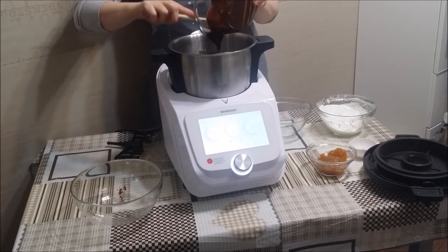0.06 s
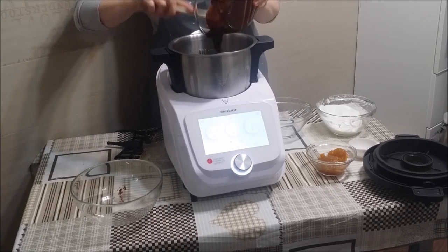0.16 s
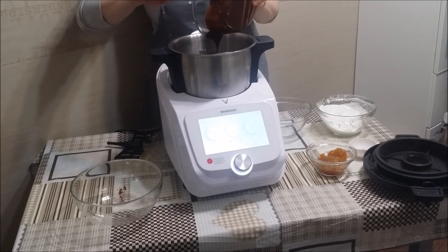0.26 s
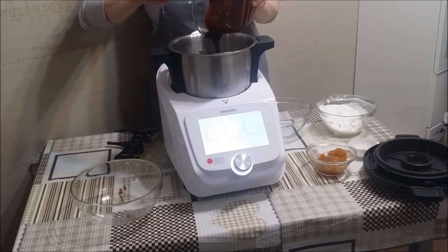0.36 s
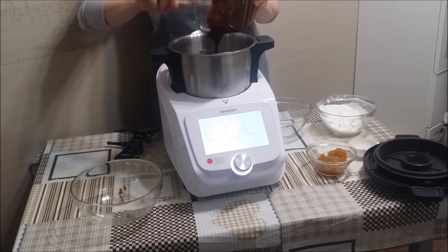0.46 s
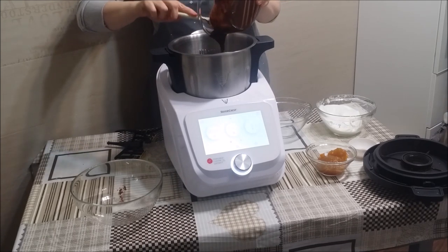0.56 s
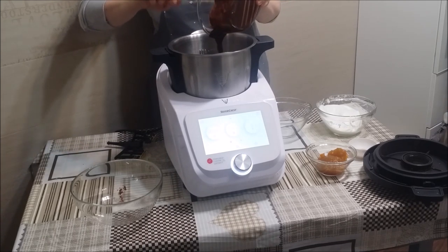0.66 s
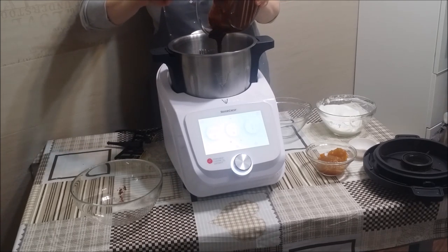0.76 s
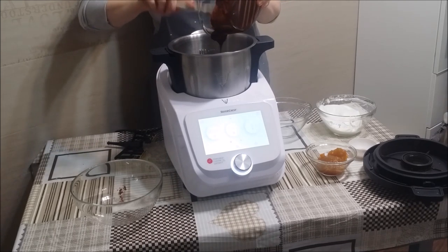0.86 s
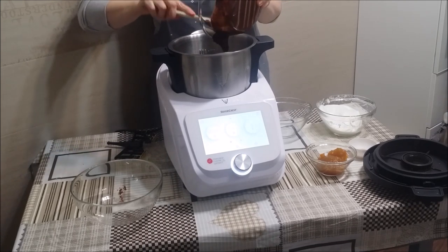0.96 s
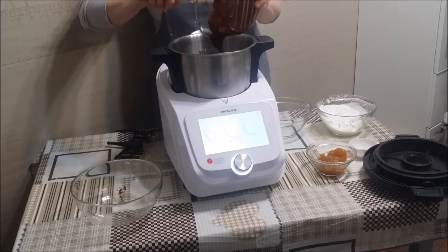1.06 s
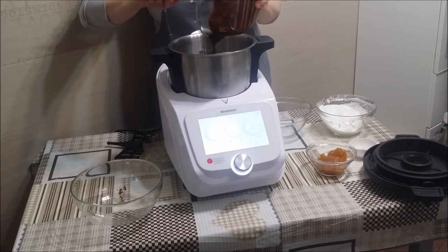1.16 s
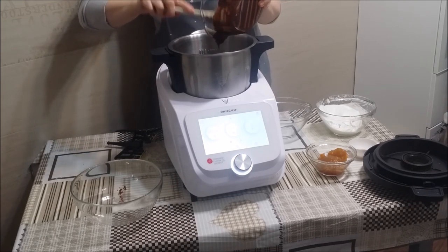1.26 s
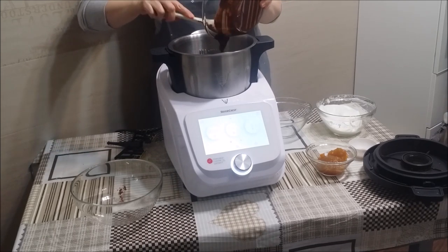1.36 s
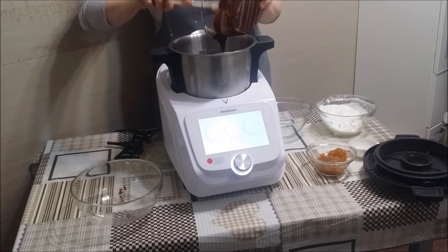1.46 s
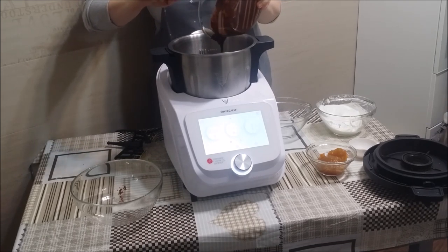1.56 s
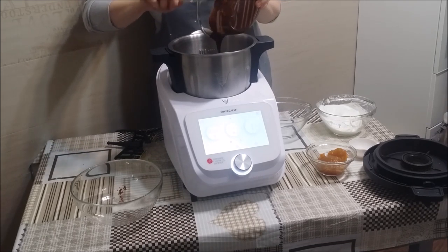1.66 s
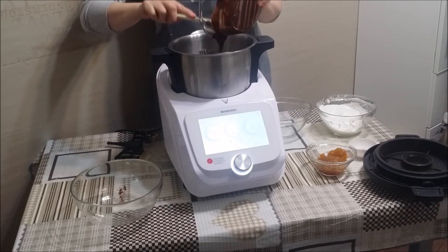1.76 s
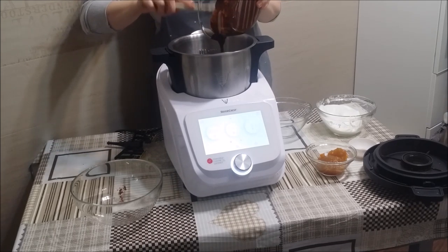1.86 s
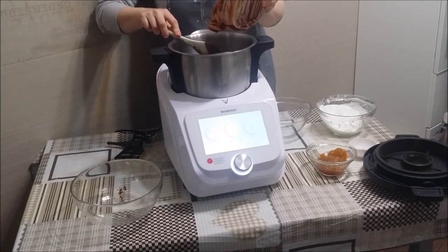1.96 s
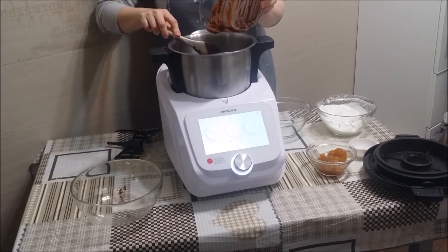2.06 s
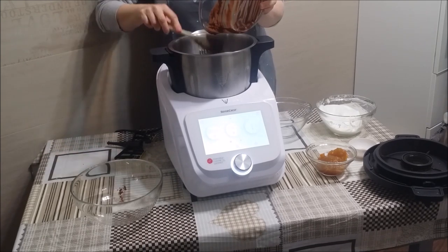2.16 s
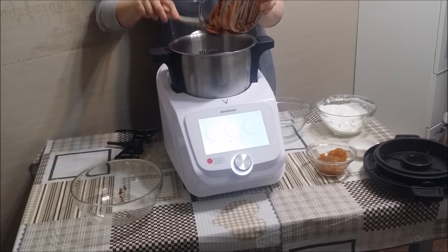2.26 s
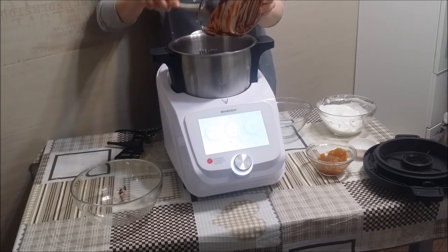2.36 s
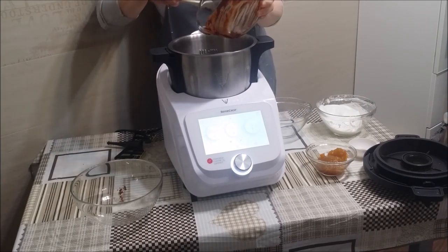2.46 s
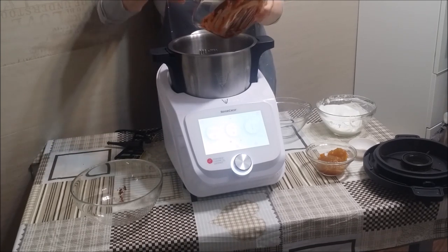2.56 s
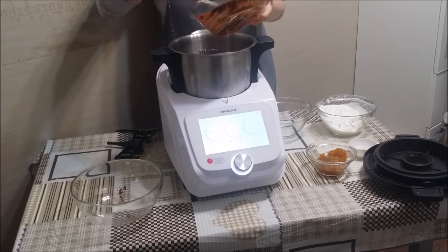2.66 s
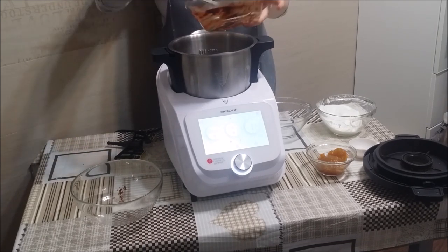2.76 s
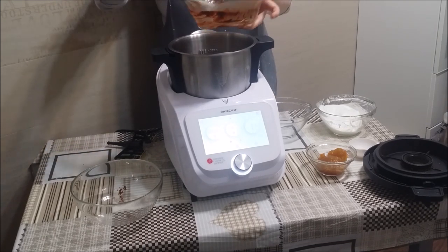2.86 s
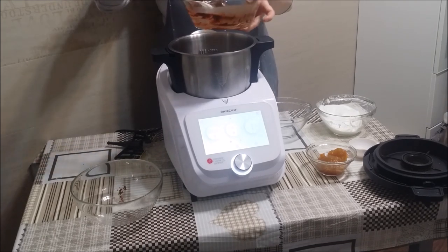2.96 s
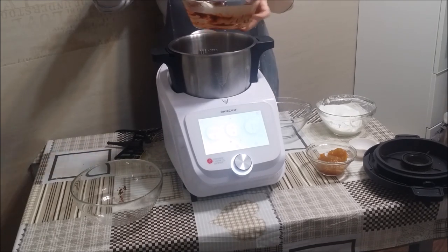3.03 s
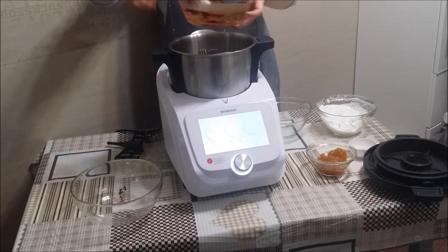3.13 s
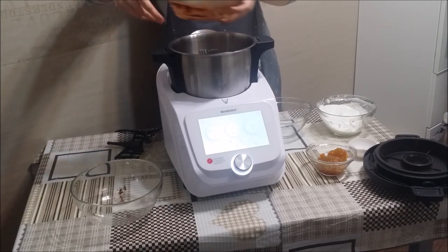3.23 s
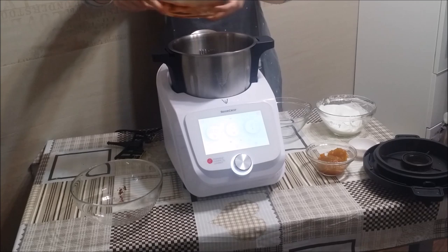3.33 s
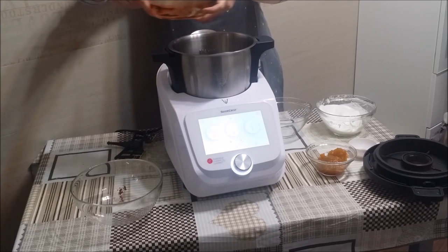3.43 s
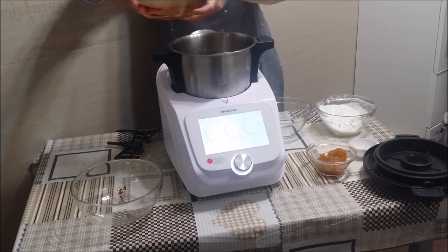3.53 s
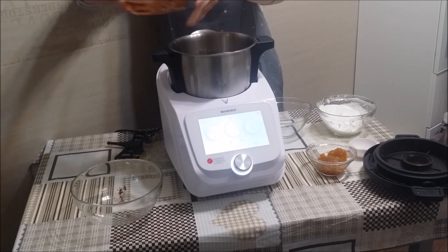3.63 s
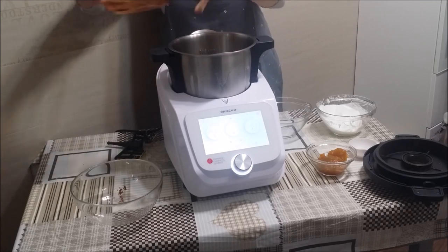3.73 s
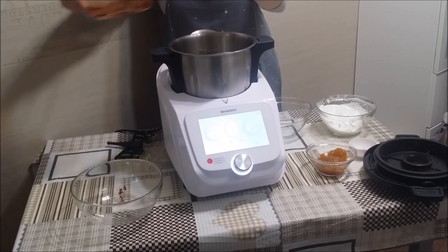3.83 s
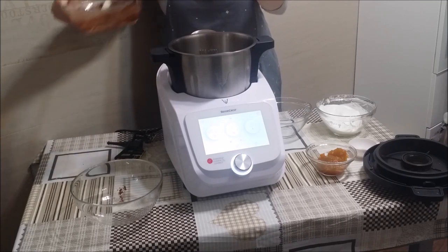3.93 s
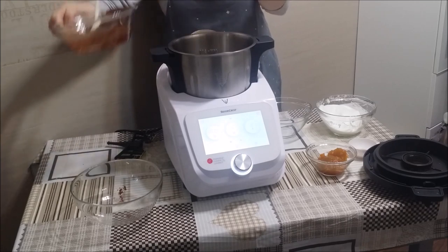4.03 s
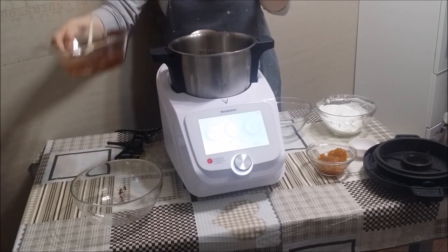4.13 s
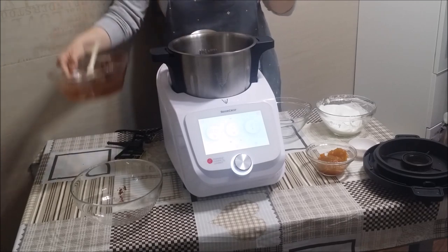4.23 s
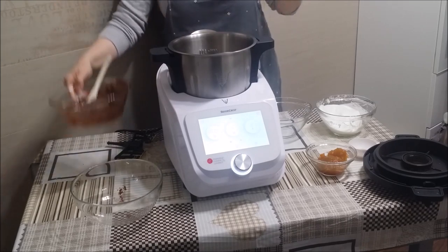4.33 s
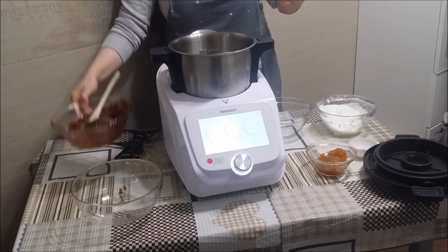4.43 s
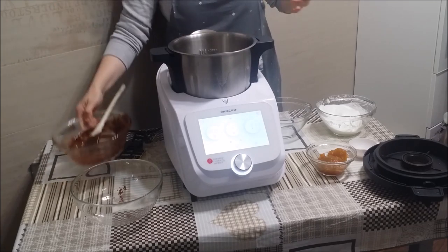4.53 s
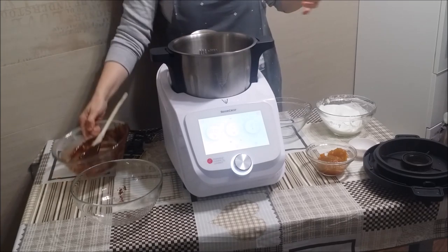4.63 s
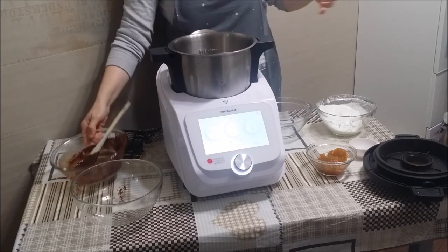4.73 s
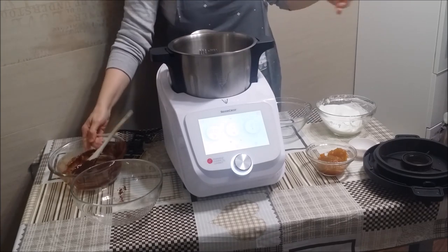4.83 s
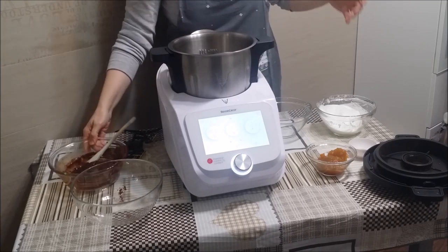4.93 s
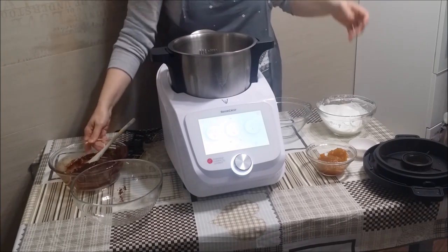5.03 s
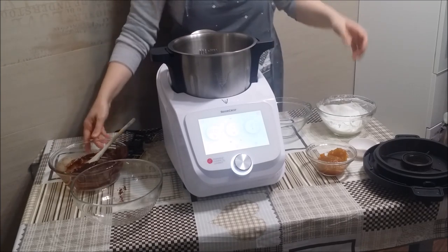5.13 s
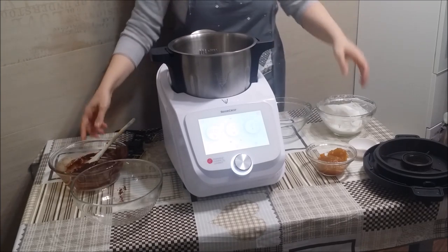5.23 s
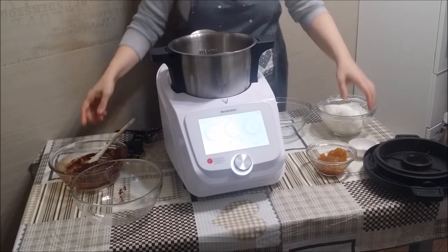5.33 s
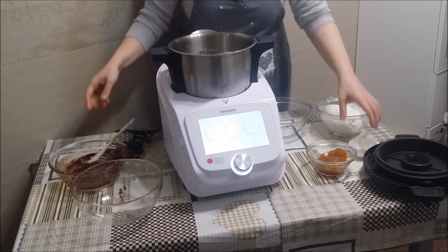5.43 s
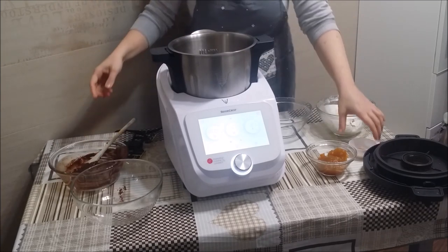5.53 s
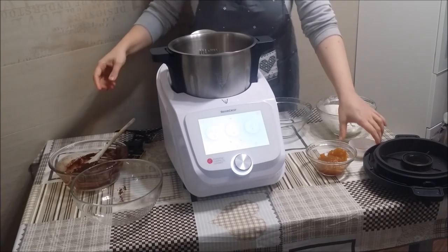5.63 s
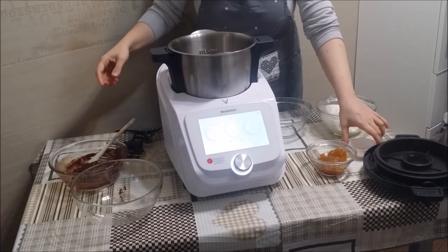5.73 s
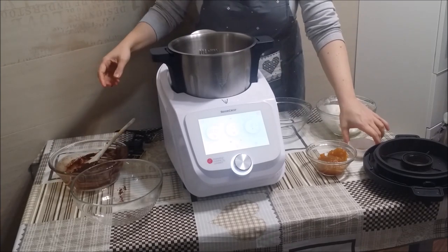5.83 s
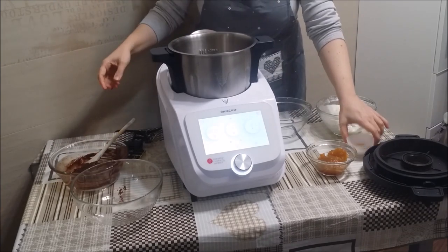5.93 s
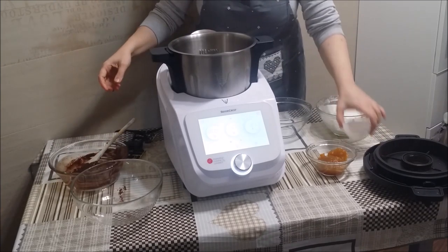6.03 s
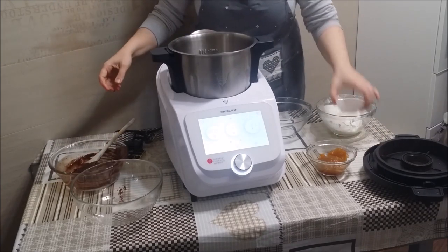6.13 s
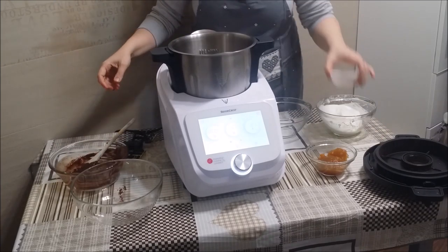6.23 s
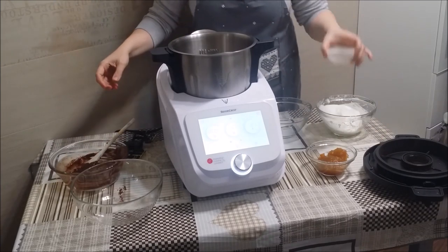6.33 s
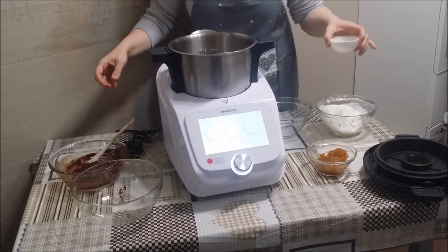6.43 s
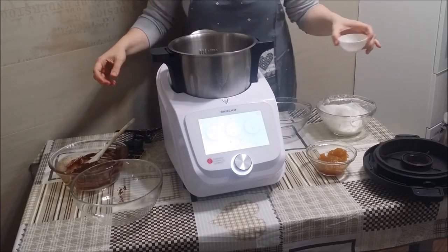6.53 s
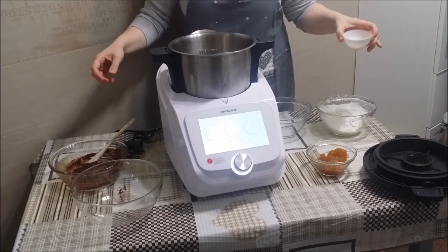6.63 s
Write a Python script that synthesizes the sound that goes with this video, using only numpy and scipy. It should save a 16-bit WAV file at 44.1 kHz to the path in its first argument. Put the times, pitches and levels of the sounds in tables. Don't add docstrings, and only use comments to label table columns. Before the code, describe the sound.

Quiet kitchen with fridge hum, low house rumble, slight hiss and a thin electric whine towards the left. Several muffled spoon pats on a loaded glass dish come first, then a wet smack and sharp double knock on a steel pot with a hollow boom. A small rim tink leads to a clear glass clink with rattling bounces. Later the dish thumps down and rocks; finally a cup grazes barely audibly. Stereo camera microphone, short live echo.

```python
import sys
import numpy as np
from scipy import signal
from scipy.fft import rfft, irfft, next_fast_len
from scipy.io import wavfile
from scipy.ndimage import uniform_filter1d

SR = 44100
rng = np.random.default_rng(int(sys.argv[2]) if len(sys.argv) > 2 else 0)


def volts_from_decibels(level):
    exponent = np.asarray(level, float) / 20
    return 10 ** exponent


def wrap_up_sound(samples):
    columns = np.atleast_2d(samples).T
    tamed = np.clip(columns, -1, 1)
    steps = np.round(tamed * 32767).astype(np.int16)
    wavfile.write(sys.argv[1], SR, steps)


N = 294984
T = np.arange(N) / SR

SHAFT_ORDERS = (2, 4, 6, 13, 17, 18, 19, 20)
SHAFT_ORDER_DB = (-48.5, -84.5, -71.5, -80.5, -89.5, -76, -83, -82.5)
CYCLE_STARTS_S = (.250, 2.473)
CYCLE_COUNTS = (3, 7)
# freq_hz, density_db_per_hz
AIR_COLOUR = [(20, -12.5), (34, 1), (50, -13), (80, -1), (150, -3), (300, -4), (520, -11), (900, -14),
              (1500, -22), (6500, -29), (7700, -23), (8600, -21), (9800, -28), (15500, -29)]
# start_s, length_s, level_db
SWELLS = [
    (0, .56, -59.5),
    (.6, .85, -63),
    (1.55, 0.88, -65),
    (2.47, .68, -64),
    (3.3, 0.48, -62),
    (5.35, 0.85, -65),
]
# start_s, peak_db, treble_db
PATS = [
    (.014, -37.5, 0.5),
    (.480, -36, 2),
    (.904, -45, -4),
    (1.265, -43.5, -10),
    (1.767, -37, -9),
    (2.795, -56, -10),
]
# freq_hz, level_db, t60_s
FULL_DISH_MODES = [(700, -5, .06), (739, 0, .13), (832, -4, .09), (964, -8, .11), (1100, -20, .07),
                   (408, -15, .07)]
# freq_hz, density_db_per_hz
PAT_COLOUR = [(200, -30), (350, -12), (600, -8), (780, 0), (1100, -13), (1500, -20), (2500, -27),
              (4000, -35), (9000, -54)]
# start_s, peak_db, centre_hz,
# width_hz
SMACKS = [(0.016, -73.5, 4164, 40), (.682, -56.5, 3720, 5700), (1.209, -69, 1110, 150),
          (1.908, -60.5, 5750, 6000), (2.004, -43, 2660, 1400), (2.369, -67, 10500, 5000),
          (2.797, -59, 3650, 2450), (4.309, -67.5, 1100, 150), (5.305, -67.5, 1120, 60.2),
          (5.39, -63, 660, 40.3), (5.746, -80, 8300, 200), (3.027, -60, 13040, 4030),
          (6.312, -69, 1070, 150)]
# start_s, length_s, sleeve_db, glass_db
STROKES = [
    (1.007, .1, -69, -99),
    (1.109, 0.24, -65, -99),
    (1.386, 0.13, -65.5, -99),
    (3.621, 0.15, -65, -70.5),
    (4.08, 0.3, -77, -71.5),
    (4.28, 0.11, -71.5, -107),
    (6.267, 0.112, -70.5, -99),
]
# freq_hz, density_db_per_hz
SLEEVE_COLOUR = [(300, 3.5), (900, 4), (2500, -3.5), (5000, -5), (9000, -6.5), (14000, -20)]
# freq_hz, level_db, t60_s
STROKED_DISH_MODES = [(945, -6, .12), (2064, 0, .12), (3478, -4, .12), (5240, 1, .12), (7300, -5, .05),
                      (8540, -4, .05), (9680, -10, .08)]
# start_s, peak_db, treble_db
KNOCKS = [
    (2.002, -35, 1),
    (2.077, -20, 10),
    (2.084, -25, 0.5),
    (2.196, -26, -2.5),
    (2.207, -39, 1),
]
# freq_hz, level_db, t60_s
POT_MODES = [(1066, -9, 0.26), (1398, -14, .15), (1886, -23, 0.52), (1995, -3, 0.28), (1950, -14, .1),
             (2320, 4.5, 0.11), (2935, -11, .3), (2950, -5, 0.26), (3230, 7.5, 0.12), (3500, -2, 0.24),
             (3865, -2.5, .15), (4400, 5, 0.05), (5420, 4, 0.083), (5720, -25, 0.19), (6470, -18.5, 0.18),
             (6650, -24, .2)]
# freq_hz, density_db_per_hz
KNOCK_COLOUR = [(150, -17), (400, -3.5), (560, -9.5), (1100, -7.5), (1650, -8), (1950, 3.5), (2600, -12.5),
                (3400, -5.5), (4500, -13.5), (6500, -10.5), (8500, -18.5), (11000, -32), (15000, -39.5)]
# start_s, peak_db, treble_db
BOOMS = [
    (2.003, -33.5, -5.5),
    (2.079, -27.5, -5.5),
    (2.092, -24.5, 7),
    (2.198, -24, -12.5),
    (2.215, -29, -2),
]
# freq_hz, level_db, t60_s
CASE_MODES = [(146, -3.5, 0.36), (182, 1.5, 0.1), (238.3, -8, 0.14), (293, -2.5, 0.12), (369, 0, 0.073),
              (419, -8, 0.18), (590, -6, 0.045)]
# start_s, peak_db, treble_db
TINKS = [
    (2.795, -39, -12.5),
    (2.866, -64, -2),
]
# freq_hz, level_db, t60_s
RIM_MODES = [(4380, -4, .3), (4420, 0, .25), (4480, -6, .1), (1530, -3, .06), (1700, -4, .06),
             (1400, -7, .05), (640, -8, .06), (6820, -20, .1)]
# start_s, peak_db, treble_db
CLINKS = [
    (3.026, -19, -3.5),
    (3.033, -22, 3),
    (3.043, -36.5, 10.5),
    (3.128, -33, -5),
    (3.171, -36.5, -2),
]
# freq_hz, level_db, t60_s
EMPTY_DISH_MODES = [(393, -24, 0.19), (935.8, -9, 0.34), (2060, 3.5, 0.12), (2052, 4, 0.32),
                    (2116, -7.5, 0.12), (3462, -4.5, 0.19), (4500, -12, 0.072), (5260, -18, 0.36),
                    (7300, -21.5, 0.28), (8560, -15.5, 0.23), (8700, -17.5, 0.141), (9100, -21, 0.22),
                    (9600, -26, 0.22), (10150, -28.5, .15), (11640, -29, 0.069)]
# freq_hz, density_db_per_hz
CLINK_COLOUR = [(250, -37.5), (420, 3.5), (900, -9), (1200, -16), (1800, 9), (2600, -4.5), (5000, 0),
                (9000, -12.5), (12000, -25.5), (15000, -37.5)]
# start_s, peak_db, treble_db
LANDINGS = [
    (4.984, -27.5, 11),
    (4.991, -16, 4),
    (4.999, -21, 5),
    (5.021, -36, 7.5),
    (5.068, -28, 6),
    (5.129, -34, 11.5),
    (5.144, -22.5, -18.5),
    (5.205, -37.5, -10),
    (5.275, -58, -16),
]
# freq_hz, level_db, t60_s
TABLE_MODES = [(129.5, -6.5, 0.065), (157, 0.5, 0.14), (214.6, -8, 0.44), (302, 1, 0.1), (331, 2.5, 0.069),
               (444, -3.5, 0.1), (481, 2.5, 0.045), (540, -4, 0.059), (671.5, -16, 0.26),
               (843, -14.5, 0.079), (940, -20, 0.09), (1120, -23.5, 0.11), (1470, -33, 0.033)]
# freq_hz, density_db_per_hz
LANDING_COLOUR = [(59, -3.5), (100, -29.5), (123, -5), (337, -2.5), (407, -6.5), (885, -28.5), (1240, -38),
                  (1530, -37), (1840, -45), (8340, -52.5), (15000, -59)]
# start_s, peak_db, treble_db
GRAZES = [
    (5.745, -71.5, 3),
    (5.775, -69, -1.5),
    (5.81, -71.5, 0),
    (5.935, -75, 0),
]
# freq_hz, level_db, t60_s
CUP_MODES = [(8330, 0, .12), (8800, -8, .08), (9060, -3, .1), (9500, -1, .1), (10750, -4, .14)]
# freq_hz, t60_s
ROOM_T60 = [(100, 0.65), (300, 0.31), (1000, 0.56), (3000, 0.47), (8000, 0.45), (14000, 0.41)]
# freq_hz, level_db
ROOM_SHARE = [(80, -1.5), (150, -4.5), (400, 1.5), (550, -3.5), (1000, 1), (3000, 1), (9000, -2),
              (15000, -4)]
# freq_hz, likeness_0_to_1
LIKENESS = [(60, 0.5), (130, 1), (290, 0.84), (640, 0.43), (1410, 0), (3100, 0), (6820, 0.15),
            (15000, 0.14)]
# freq_hz, difference_db
PORTS = [(60, -3), (200, -4.5), (400, -2.5), (800, -2), (1600, -1.5), (4500, 0), (6500, 3), (7700, -1.5),
         (8800, -6.5), (11000, -3.5), (15000, -1)]


def along(table, hz):
    points_hz, values = np.array(table).T
    return np.interp(np.log(np.maximum(hz, 1)), np.log(points_hz), values)


def unit(x):
    return x / np.sqrt(np.sum(x ** 2))


def colour(x, table):
    gain_db = along(table, np.fft.rfftfreq(4096, 1 / SR))
    cepstrum = irfft(np.log(volts_from_decibels(gain_db)))
    cepstrum[1:2048] *= 2
    cepstrum[2049:] = 0
    response = unit(irfft(np.exp(rfft(cepstrum))))
    return signal.fftconvolve(x, response)[:len(x)]


def walk(rate_hz):
    hold = int(SR / rate_hz)
    steps = np.repeat(rng.standard_normal(N // hold + 1), hold)
    return 1.41 * uniform_filter1d(uniform_filter1d(steps, hold), hold)[:N]


def noise_bands(size):
    f = np.fft.rfftfreq(size, 1 / SR)
    like = np.clip(along(LIKENESS, f), 0, 1)
    shares = np.sqrt([(1 + like) / 2, (1 - like) / 2])
    mid, side = rfft(rng.standard_normal((2, size))) * shares
    stereo = np.array([mid + side, mid - side])
    for hz in 22 * 2 ** (np.arange(30) / 3):
        octaves = abs(np.log2(np.maximum(f, 1) / hz))
        yield hz, irfft(np.clip(1 - 3 * octaves, 0, 1) * stereo, size)


def add(out, start_s, x):
    i = int(start_s * SR)
    out[..., i:i + x.shape[-1]] += x[..., :N - i]


def fridge():
    shaft_hz = 48.23
    turn = 2 * np.pi * shaft_hz * T + 0.095 * walk(2.095)
    out = np.zeros(N)
    for order, db in zip(SHAFT_ORDERS, SHAFT_ORDER_DB):
        level = volts_from_decibels(db + 0.056 * order * walk(3))
        out += np.sqrt(2) * level * np.sin(order * turn + order)
    return out


def air():
    level_db = -59.5
    size = next_fast_len(N)
    mix = np.zeros((2, N))
    for hz, band in noise_bands(size):
        flicker_db = 3.45 * min(300 / hz, 1) ** 0.15
        mix += volts_from_decibels(flicker_db * walk(2.943)) * band[:, :N]
    gain = volts_from_decibels(along(AIR_COLOUR, np.fft.rfftfreq(size, 1 / SR)))
    out = irfft(rfft(mix, size) * gain, size)[:, :N]
    return volts_from_decibels(level_db) * out / out.std()


def whine():
    cool_hz, climb_hz, climb_at_s, climb_s = 6990, 139, 4.92, 0.53
    wander_hz, restart_hz, restart_s = 13, 25.02, 0.098
    cycle_s, gap_s = 0.6388, 0.018
    level_db, right_db = -65, -28.5
    runs = [start_s + cycle_s * np.arange(n) for start_s, n in zip(CYCLE_STARTS_S, CYCLE_COUNTS)]
    since_s = T - np.concatenate(runs)[:, None]
    hz = cool_hz + climb_hz * (1 + np.tanh((T - climb_at_s) / climb_s)) / 2
    hz += wander_hz * walk(5) + 11 * walk(40)
    hz += restart_hz * np.sum((since_s > 0) * np.exp(-abs(since_s) / restart_s), axis=0)
    on = np.prod(abs(since_s) > gap_s / 2, axis=0)
    level = volts_from_decibels(level_db + 0.42 * walk(60)) * uniform_filter1d(1. * on, 60)
    tone = level * np.sin(2 * np.pi * np.cumsum(hz) / SR)
    return tone * volts_from_decibels(np.array([[3], [-0.5 + right_db]]))


def rumble():
    house_hz = 34.2
    swell = np.zeros(N)
    for start_s, length_s, db in SWELLS:
        swell += volts_from_decibels(db) * np.sin(np.pi * np.clip((T - start_s) / length_s, 0, 1))
    hz = house_hz + 1.5 * walk(5.1)
    return np.sqrt(2) * swell * volts_from_decibels(1.5 * walk(6)) * np.sin(2 * np.pi * np.cumsum(hz) / SR)


def ring(modes, treble_db=0., split=.004):
    scatter_db, flutter_db = 1.0, 3.5
    t = T[:SR // 2]
    out = np.zeros((2, len(t)))
    for hz, db, t60_s in modes:
        a, b = rng.standard_normal(2)
        angle = np.arccos(np.clip(along(LIKENESS, hz), 0, 1)) / 2
        port_phase = np.sign(a) * angle * np.array([[1], [-1]])
        beat = np.sin(2 * np.pi * hz * t + port_phase)
        beat = beat + .5 * np.sin(2 * np.pi * hz * (1 + split) * t + a - port_phase)
        sweep = np.interp(t, np.linspace(0, .5, num=32), rng.standard_normal(32))
        flutter = min(hz / 4500, 1) * flutter_db * sweep
        tilt_db = treble_db * np.log2(hz / 500) / 3
        out += volts_from_decibels(db + scatter_db * b + flutter + tilt_db) * beat * 1000. ** (-t / t60_s)
    return np.sqrt(2) * unit(out)


def blows(events, modes, blow_colour, crack_db, crack_s, gain_db, push_s, split=0.015):
    out = np.zeros((3, N))
    t = T[:4096]
    push = 1 - np.exp(-T[:SR // 2] / push_s)
    for start_s, db, treble_db in events:
        crack = rng.standard_normal(4096) * np.exp(-t / crack_s) * (1 - np.exp(-t / push_s))
        tilted = [(f, d + treble_db * np.log2(f / 500) / 3) for f, d in blow_colour]
        crack = colour(crack, tilted)
        add(out[:2], start_s, volts_from_decibels(db + gain_db) * ring(modes, treble_db, split) * push)
        add(out[2], start_s, volts_from_decibels(db + gain_db + crack_db) * unit(crack))
    return out


def pats():
    return blows(PATS, FULL_DISH_MODES, PAT_COLOUR, crack_db=-10, crack_s=.003, gain_db=25, push_s=.002)


def room(x):
    level_db, rise_s = 1.5, 0.0037
    wall_s, wall_db, wall_width_s = 0.034, 5, 0.0022
    t = T[:32768]
    tail = np.zeros((2, len(t)))
    for hz, band in noise_bands(len(t)):
        tail += volts_from_decibels(along(ROOM_SHARE, hz)) * band * 1000. ** (-t / along(ROOM_T60, hz))
    lump = volts_from_decibels(wall_db * np.exp(-((t - wall_s) / wall_width_s) ** 2))
    echo = volts_from_decibels(level_db) * np.sqrt(2) * unit(tail * lump * (1 - np.exp(-t / rise_s)))
    return signal.fftconvolve(x[None], echo, axes=1)[:, :N]


def smacks():
    out = np.zeros(N)
    for start_s, db, hz, width_hz in SMACKS:
        b, a = signal.iirpeak(hz, hz / width_hz, SR)
        click = rng.standard_normal(2048) * np.exp(-T[:2048] / 0.008)
        click = signal.lfilter(b, a, signal.lfilter(b, a, click))
        add(out, start_s, volts_from_decibels(db + 29.5) * unit(click))
    return out


def strokes():
    slips = rng.standard_normal(N) * volts_from_decibels(2.5 * rng.exponential(size=N)) * volts_from_decibels(1.5 * walk(40))
    slips /= slips.std()
    sleeve, glass = np.zeros(N), np.zeros(N)
    for start_s, length_s, sleeve_db, glass_db in STROKES:
        swell = np.sin(np.pi * np.clip((T - start_s) / length_s, 0, 1)) ** 2
        sleeve += volts_from_decibels(sleeve_db) * swell
        glass += volts_from_decibels(glass_db) * swell
    dish = ring(STROKED_DISH_MODES)[0]
    return colour(slips * sleeve, SLEEVE_COLOUR) + signal.fftconvolve(slips * glass, dish)[:N]


def knocks():
    return blows(KNOCKS, POT_MODES, KNOCK_COLOUR, crack_db=3.5, crack_s=0.012, gain_db=16.0, push_s=0.00033)


def booms():
    return blows(BOOMS, CASE_MODES, LANDING_COLOUR, crack_db=-9.5, crack_s=0.013, gain_db=24.5, push_s=0.00075)


def tinks():
    return blows(TINKS, RIM_MODES, CLINK_COLOUR, crack_db=-13.5, crack_s=.02, gain_db=23.5, push_s=0.0013)


def clinks():
    return blows(CLINKS, EMPTY_DISH_MODES, CLINK_COLOUR, crack_db=-16.5, crack_s=0.0031, gain_db=25.5,
                 push_s=0.00047, split=0.005)


def landings():
    return blows(LANDINGS, TABLE_MODES, LANDING_COLOUR, crack_db=-7.0, crack_s=0.01, gain_db=26.0, push_s=0.0012)


def grazes():
    return blows(GRAZES, CUP_MODES, CLINK_COLOUR, crack_db=-30, crack_s=.01, gain_db=34.5, push_s=.004)[:2]


def scene():
    ring_room_db = -8
    hits = pats() + knocks() + booms() + tinks() + clinks() + landings()
    hits = signal.sosfilt(signal.butter(4, 105, "high", fs=SR, output="sos"), hits)
    rings = hits[:2]
    rough = hits[2] + smacks() + strokes()
    echo = room(rough + volts_from_decibels(ring_room_db) * rings[0])
    steady = fridge() + air() + whine() + rumble()
    return rings + rough + echo + steady + grazes()


def roll_off(x):
    return signal.sosfilt(signal.butter(12, 16400, fs=SR, output="sos"), x)


def record(dry):
    port_lag_s, top_hz = 1.2e-4, 15550
    gain_s, threshold_db = 0.12, -39.5
    f = np.fft.rfftfreq(N, 1 / SR)
    tilt_db = along(PORTS, f) / 2
    lag = np.exp(-2j * np.pi * f * np.array([[0], [port_lag_s]]))
    x = irfft(rfft(dry) * volts_from_decibels(np.array([tilt_db, -tilt_db])) * lag * (f < top_hz), N)
    k = 1 / (gain_s * SR)
    loud = signal.lfilter([k], [1, k - 1], np.abs(x).mean(axis=0))
    mix = x / np.maximum(loud / volts_from_decibels(threshold_db), 1) ** 0.11
    return roll_off(mix)


dry = scene()
out = record(dry)
wrap_up_sound(out)
```